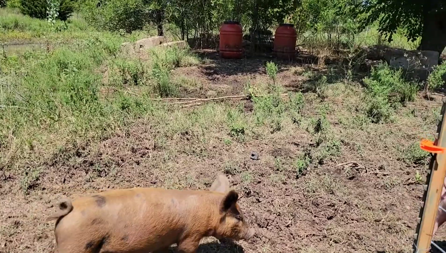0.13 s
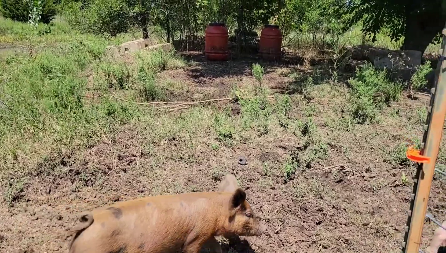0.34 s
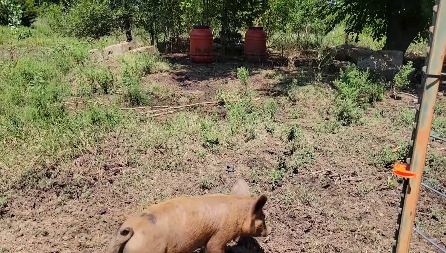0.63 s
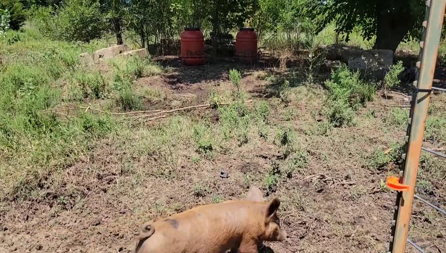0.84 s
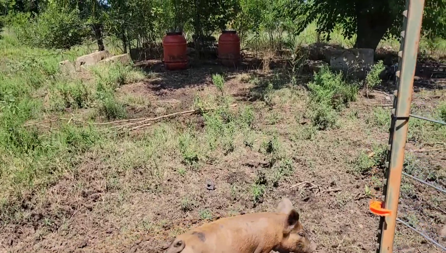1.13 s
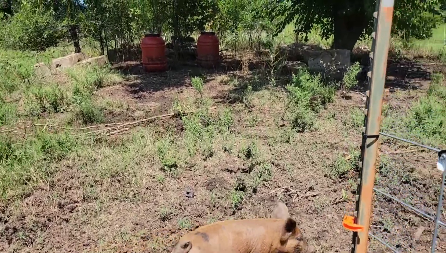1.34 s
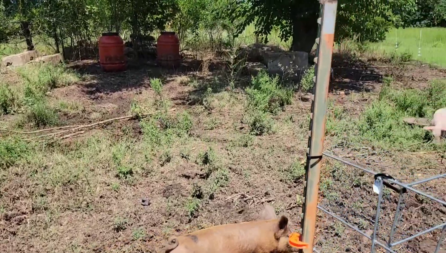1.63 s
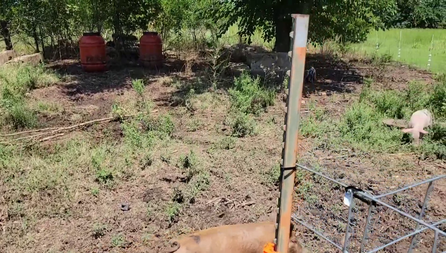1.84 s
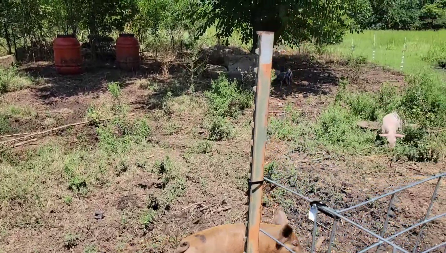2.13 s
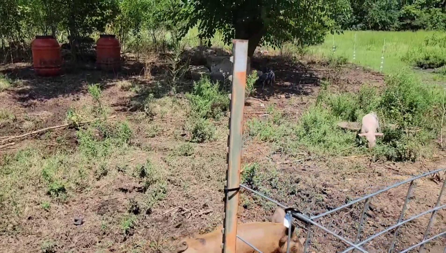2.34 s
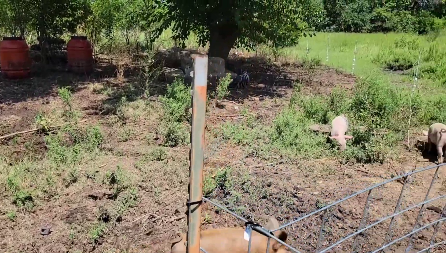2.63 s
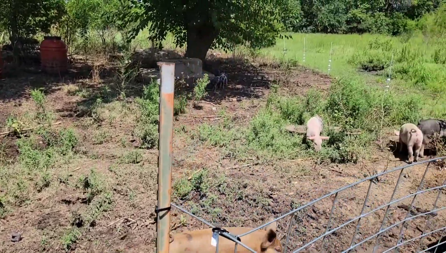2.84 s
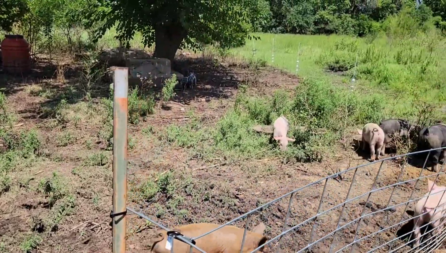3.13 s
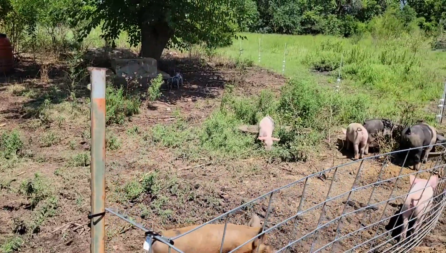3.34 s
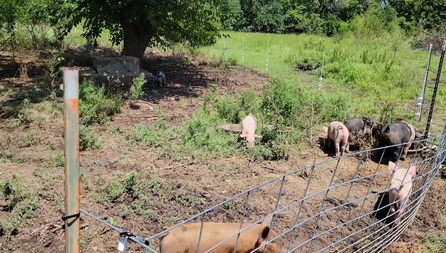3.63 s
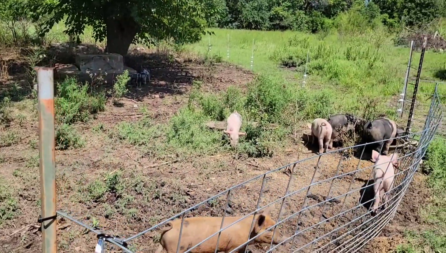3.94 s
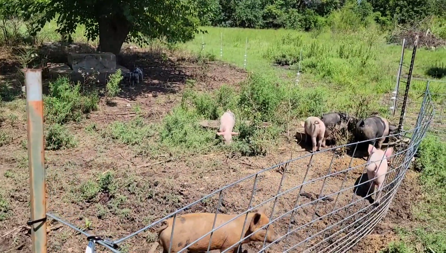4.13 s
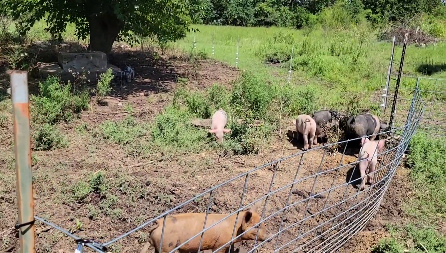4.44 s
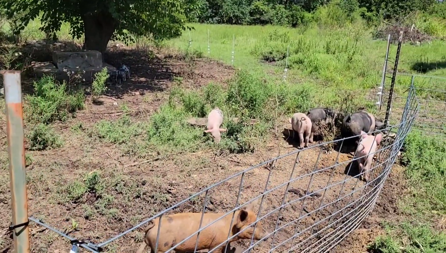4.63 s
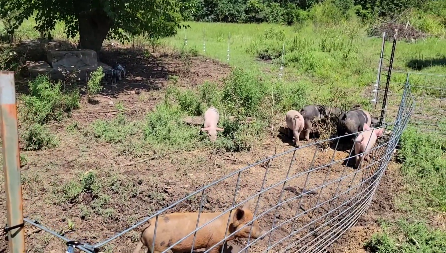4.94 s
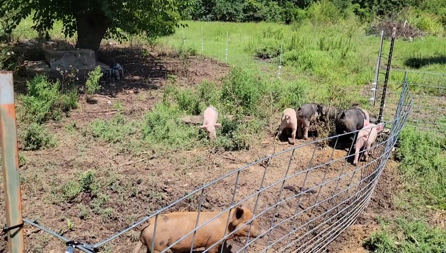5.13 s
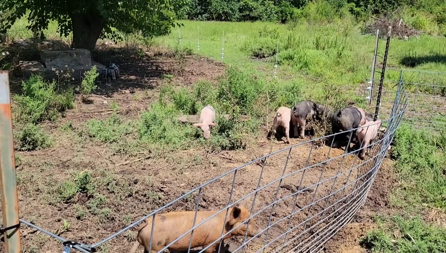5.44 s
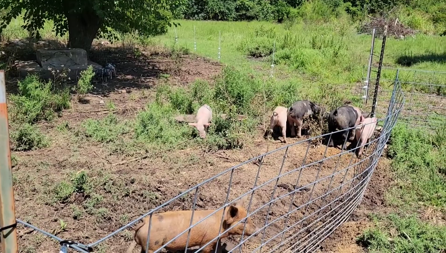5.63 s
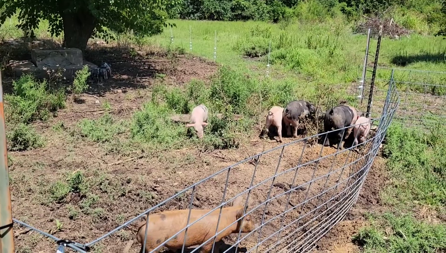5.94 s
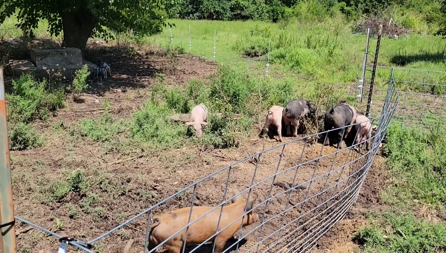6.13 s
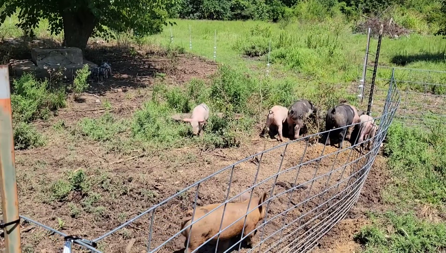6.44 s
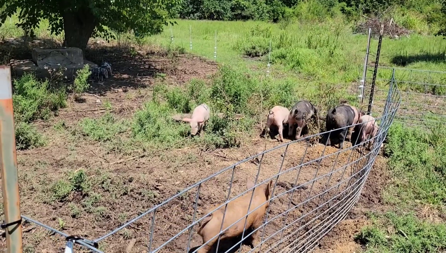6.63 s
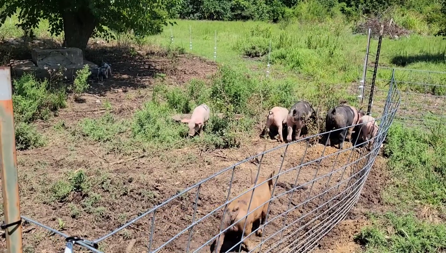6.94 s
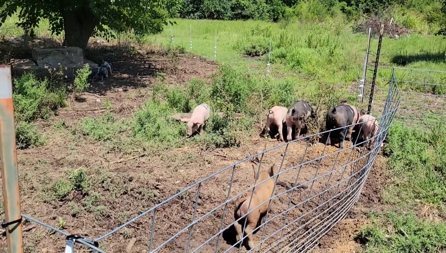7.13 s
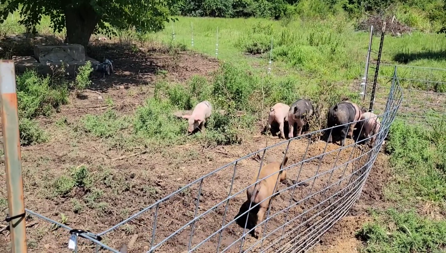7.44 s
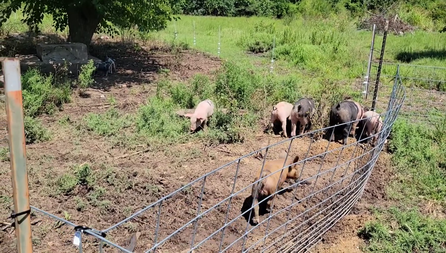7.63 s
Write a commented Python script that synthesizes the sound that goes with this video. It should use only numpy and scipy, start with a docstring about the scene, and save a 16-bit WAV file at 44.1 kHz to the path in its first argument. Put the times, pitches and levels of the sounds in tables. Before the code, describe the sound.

A shrill drone of cicadas over low, gusty wind rumble, with occasional soft grunts, sniffs and smacks from young pigs.

```python
"""Cicadas over a pig pen.

A hot day, heard by a hand-held phone that slowly turns. Two near cicadas buzz in turn, their fast clicks
fusing into combs of overtones with a hiss and a whine; a third throbs lower over a far chorus.
Piglets give short grunts, smacks and sniffs. Wind buffets both microphone ports."""
import sys
import numpy as np
from scipy import signal
from scipy.fft import rfft, irfft
from scipy.io import wavfile
from scipy.ndimage import uniform_filter1d, map_coordinates

SR = 44100
rng = np.random.default_rng(int(sys.argv[2]) if len(sys.argv) > 2 else 0)


def dump_mix(stems):
    """Bounce the given channels to the path in sys.argv[1] as a 16-bit WAV at rate SR."""
    frames = np.atleast_2d(stems).T  # one column per channel
    limited = np.clip(frames, -1, 1)  # hard clip at full scale
    pcm = np.round(limited * 32767).astype(np.int16)
    wavfile.write(sys.argv[1], SR, pcm)


N = 342642
T = np.arange(N) / SR
# Left port lag; it shrinks as the phone turns towards the first buzzer and the throbber.
FIRST_LAG_MS = np.maximum(0.384 - 0.0853 * T, 0.066)
SECOND_LAG_MS = -0.61


def undb(db):
    return 10 ** (np.asarray(db) / 20)


def level(x, rms_db):
    return x * undb(rms_db) / np.sqrt(np.mean(x ** 2))


def curves(table):
    """Table columns, interpolated linearly in time."""
    times, *columns = np.transpose(table)
    return [np.interp(T, times, column) for column in columns]


def sides(pan_db):
    """Left and right gains; pan is left minus right."""
    return undb(np.array([pan_db, -pan_db]) / 2).reshape(2, -1)


def colour(x, spectrum):
    """Filter by (frequency [Hz], gain [dB]) points; rms 1."""
    hz, db = np.transpose(spectrum)
    bins_hz = np.arange(N // 2 + 1) * SR / N + 1
    gain = undb(np.interp(np.log(bins_hz), np.log(hz), db, -90, -90))
    return level(irfft(rfft(x) * gain, N), 0)


def ring(x, hz, width_hz, passes=1):
    """Resonance with unity gain at the centre."""
    for _ in range(passes):
        x = signal.lfilter(*signal.iirpeak(hz, hz / width_hz, SR), x)
    return x


def drift(rate_hz):
    """Smoothed random steps; spread near 1."""
    hold = int(SR / rate_hz)
    steps = np.repeat(rng.standard_normal(N // hold + 1), hold)
    return 1.39 * uniform_filter1d(uniform_filter1d(steps, hold), hold)[:N]


def swell(peak_s, db, fall_s, rise_ratio=1):
    """Power envelope, linear in dB either side of its peak; drops 20 dB in fall_s."""
    slope_s = np.where(T < peak_s, rise_ratio * fall_s, fall_s)
    return undb(2 * (db - 20 * np.abs(T - peak_s) / slope_s))


def port_noise(lag_ms, coherence):
    """Noise from one side reaches one port first; the rest is diffuse."""
    direct = rng.standard_normal(N)
    late = map_coordinates(direct, [np.arange(N) - lag_ms * SR / 1000], order=3)
    diffuse = rng.standard_normal((2, N))
    return np.sqrt(coherence) * np.array([late, direct]) + np.sqrt(1 - coherence) * diffuse


# Chorus and rustle spectrum: (frequency [Hz], gain [dB])
FIELD_SPECTRUM = [(120, -35), (200, -12.5), (268, -14.5), (777, -16), (1870, -21), (2330, -25),
                  (3190, -9.5), (6050, -7), (6640, -3), (7410, -5), (8900, -3), (11300, -13.5),
                  (15100, -10.5), (16000, -15)]
# Likeness of the ports: (frequency [Hz], correlation [-1..1])
FIELD_CORRELATION = [(150, 0.56), (300, 0.11), (640, -0.37), (1400, -0.61), (2200, -0.029), (3100, -0.24),
                     (16000, 0.039)]
# Treble shading by the turning phone: (time [s], left gain [dB], right gain [dB])
PORT_SHADE = [(0, 0.5, -0.5), (3, 0, 2.5), (5, -4.5, -4.5), (7.77, 0, -3.5)]


def field():
    """Far insects above, leaves and soil below; bands drift independently."""
    correlation = np.interp(np.arange(N // 2 + 1) * SR / N, *np.transpose(FIELD_CORRELATION))
    mid, side = rfft(rng.standard_normal((2, N))) * np.sqrt([1 + correlation, 1 - correlation])
    air = colour(irfft([mid + side, mid - side], N), FIELD_SPECTRUM)
    soil, below_chorus, below_top = (
        signal.sosfiltfilt(signal.butter(3, hz, fs=SR, output="sos"), air) for hz in (800, 2400, 10500))
    rustle = soil * undb(2.25 * drift(9)) + (below_chorus - soil) * undb(2.46 * drift(12))
    rustle_db = np.interp(T, [0, 2.5, 4, 7.77], [1.3, 0.74, -1.4, -0.94])  # the nearest pig walks off
    chorus = below_top - below_chorus
    top = (air - below_top) * undb(1.65 * np.array([drift(14), drift(14)]))
    shade = ring(air, 9150, 3400) * (undb(curves(PORT_SHADE)) - 1)
    return undb(-45) * (rustle * undb(rustle_db) + chorus + top + shade)


# Gusts: (peak time [s], relative level [dB], pan [dB], flap offset [dB], 20 dB fall time [s])
GUSTS = [(.08, -48, -8, -9.5, 0.9), (.302, -48, -11.5, -22, 0.2), (.874, -32.5, -5.5, -4, 0.09),
         (.964, -40.5, 5, -22, 0.44), (1.03, -45.5, 4, -24, 0.46), (1.235, -38.5, 1, -11, .1),
         (1.33, -38.5, -3, -11, 0.1), (1.436, -33, 8.5, -12, 0.02), (1.645, -39.5, -7, -16, 0.16),
         (1.709, -41, -10, -14, 0.12), (1.913, -39.5, -8, -13.5, 0.1), (2.302, -47, -10, -11, 0.56),
         (2.44, -42.5, -13, -14, 0.2), (2.87, -38.5, -9.5, -10.5, 0.32), (3.008, -34.5, 11.5, -12.5, 0.22),
         (3.41, -35, 1.5, -18.5, 0.23), (3.706, -40.5, 0, -14.5, 0.22), (4.103, -44, 6, -15.5, .24),
         (4.331, -25, -3.5, -5.5, 0.09), (4.519, -40, -10.5, -17, 0.17), (4.766, -43, -8, -13, 0.24),
         (4.861, -38, 5.5, -15, 0.41), (5.241, -43, -12, -23, .18), (5.467, -32, 5.5, -15.5, .09),
         (5.557, -33.5, 0.5, -23, .14), (5.7, -39.5, 3, -30, 0.16), (5.846, -43, 3.5, -33, .5),
         (6.364, -42.5, -4.5, -13, 0.13), (6.477, -38, 6, -17, 0.04), (6.61, -36.5, -8, -19, 0.27),
         (6.872, -38.5, 1, -21, 0.26), (7.024, -38, 2, -28, 0.2), (7.205, -34, 3.5, -18.5, 0.12),
         (7.319, -33.5, 13.5, -14.5, -0.02), (7.386, -31.5, 2.5, -22, 0.13), (7.495, -38.5, 9, -21, 0.2),
         (7.734, -36, 4, -22, .2)]
# Buffeting spectrum: (frequency [Hz], gain [dB])
WIND_SPECTRUM = [(8.8, 2), (15, -23.5), (46, 1.5), (69, 5.5), (119, -7.5), (190, -33.5), (373, -52),
                 (413, -77), (500, -40.5), (650, -41.5), (1100, -120)]


def wind(breeze_db=-55, breeze_flap_db=-11.5):
    """Eddies thump each port separately over a swaying breeze; sharp gusts flap higher."""
    sway_db = 0.5 * np.array([drift(5.4), drift(6.19)])
    thump_power = undb(2 * (breeze_db + sway_db)) * sides(2) ** 2
    flap_power = thump_power * undb(2 * breeze_flap_db)
    for peak_s, db, pan_db, flap_db, fall_s in GUSTS:
        gust = swell(peak_s, db, max(fall_s, 0.03), rise_ratio=0.84) * sides(pan_db) ** 2
        thump_power += gust
        flap_power += gust * undb(2 * flap_db)
    eddy_db = np.array([drift(25), drift(25)])
    thump = colour(rng.standard_normal((2, N)), WIND_SPECTRUM) * undb(3.5 + 1.28 * eddy_db)
    flap = ring(rng.standard_normal((2, N)), 150, 86, passes=2)
    flap = level(ring(flap, 224, 300), -1.5) * undb(2.5 * eddy_db)
    return thump * np.sqrt(thump_power) + flap * np.sqrt(flap_power)


# Piglet sniffs: (mid time [s], length [s], level [dB], centre [Hz], pan [dB])
SNIFFS = [(0.138, 0.038, -64, 1400, -1), (2.636, 0.049, -67, 2000, -8), (5.126, .06, -77, 1600, -13),
          (5.645, 0.033, -72, 1600, -16), (6.048, 0.032, -65.5, 1800, -8)]


def sniffs():
    """Short puffs of air."""
    out = np.zeros((2, N))
    for mid_s, length_s, db, hz, pan_db in SNIFFS:
        puff = np.exp(-(2 * (T - mid_s) / length_s) ** 4)
        out += level(ring(rng.standard_normal(N), hz, 600), db) * puff * sides(pan_db)
    return out


# Smacks and ticks: (time [s], relative level [dB], ring [Hz], pan [dB])
SMACKS = [(0.775, -51, 721, -3), (1.096, -56, 2090, 5), (2.488, -59, 1440, -0.5), (2.689, -49.5, 1340, 1),
          (2.728, -59, 1120, -8), (2.818, -62, 735, 5), (4.91, -58, 2145, -14), (6.035, -57, 854, 2),
          (6.184, -57, 1820, -18)]


def smacks(rise_s=0.0035):
    """Lip smacks and hoof ticks ring briefly."""
    out = np.zeros((2, N))
    for start_s, db, hz, pan_db in SMACKS:
        age_s = np.clip(T - start_s, 0, 1)
        tone = 0.46 * np.sin(2 * np.pi * hz * age_s)
        noise = level(ring(rng.standard_normal(N), hz, 600, passes=2), -13)
        envelope = age_s / rise_s * np.exp(1 - age_s / rise_s)
        out += undb(db) * (tone + noise) * envelope * sides(pan_db)
    return out


# Grunts: (start [s], length [s], pulse rate [Hz], level [dB], snout offset [dB], pan [dB], crest [0..1])
GRUNTS = [(0.136, 0.084, 50, -65.5, -20, -17, 0), (2.868, .04, 39.9, -60, -16, -12, 0.2),
          (3.597, 0.039, 45.2, -66, -25, -8, 0.4), (4.2886, 0.081, 55.8, -47.5, -11.5, -13, 0.28),
          (5.992, 0.064, 45.9, -57.5, -22, -3, 0.7)]
# Airway resonances: (centre [Hz], width [Hz], gain [dB])
THROAT_MODES = [(206, 133, 4.5), (350, 93, 9), (554, 120, 1), (854, 160, -7.5)]
SNOUT_MODES = [(1850, 100, -10), (2484, 180, 5)]


def grunts():
    """A few rough pulses ring the throat; after each, air puffs through the snout."""
    out = np.zeros((2, N))
    lowpass = signal.butter(4, 1000, fs=SR, output="sos")
    whistle = np.sin(2 * np.pi * SNOUT_MODES[-1][0] * T) / 8
    for start_s, length_s, rate_hz, db, snout_db, pan_db, crest in GRUNTS:
        progress = (T - start_s) / length_s
        envelope = np.interp(progress, [0, np.clip(crest, 0.1, 0.9), 1], [0.35, 1, 0.4], 0, 0)
        phase = (T - start_s) * rate_hz % 1
        pulses = 13 * (phase < rate_hz / SR) + 0.9 * rng.standard_normal(N) * np.exp(-phase / 0.3)
        puffs = (whistle + rng.standard_normal(N)) * np.exp(-((phase - 0.25) / 0.2) ** 2)
        throat = sum((-1) ** k * undb(gain_db) * ring(pulses * envelope, hz, width_hz)
                     for k, (hz, width_hz, gain_db) in enumerate(THROAT_MODES))
        snout = sum(undb(gain_db) * ring(puffs * envelope ** 2, hz, width_hz, passes=2)
                    for hz, width_hz, gain_db in SNOUT_MODES)
        voice = level(signal.sosfilt(lowpass, throat), db) + level(snout, db + snout_db)
        out += voice * np.sqrt(length_s / T[-1]) * sides(pan_db)  # rms over the grunt's length
    return out


# Throbbing song: (time [s], throb rate [Hz], relative level [dB], pan [dB])
THROB_SONG = [(0, 38.2, -50.5, -3.5), (.26, 39.23, -52, -3), (1.36, 39.16, -50.5, -3.5),
              (2.2, 39.24, -49.5, -1), (2.45, 39.15, -50.5, -3), (3.7, 39.35, -51, -4.5),
              (4.6, 39.35, -49, -2), (6.05, 39.48, -51, -2.5), (7.1, 37.7, -53.5, -4.5),
              (7.23, 37.7, -57.5, 1), (7.36, 36.5, -69, -2), (7.77, 36.4, -70, -6)]
# Clicks in one throb: (phase [0..1], level [dB])
RIB_CLICKS = [(0, 0), (.14, 0), (.27, -3), (.38, -1), (.54, -2), (.7, -7)]
# Throb spectrum: (frequency [Hz], gain [dB])
THROB_SPECTRUM = [(1470, -37), (2500, -13.5), (2750, -8.5), (3000, 6), (3140, 6), (3650, 4.5), (4190, 5.5),
                  (4540, 6), (5600, -0.5), (7280, -62), (12300, -120)]


def throbbing_cicada():
    """Each throb is a run of rib clicks: noise bursts that start sharply and decay."""
    rate_hz, db, pan_db = curves(THROB_SONG)
    phase = (np.cumsum(rate_hz) / SR + 0.3) % 1
    clicks = sum(undb(click_db) * np.exp(-((phase - onset) % 1) / 0.09) for onset, click_db in RIB_CLICKS)
    gate = 0.27 + uniform_filter1d(clicks, 30)
    fade = np.clip((db + 58) / 6, 0.05, 1)  # sinks into the chorus as the song stops
    bursts = port_noise(FIRST_LAG_MS, coherence=0.66) * gate
    return colour(bursts, THROB_SPECTRUM) * undb(db + 2) * fade * sides(pan_db)


# Hiss of the buzzers: (time [s], relative level [dB], pan [dB])
BODY_HISS = [(0, -52, -6), (.76, -61, -7), (1.34, -50, -13), (2.7, -55, -6), (3.14, -43, -1),
             (4.26, -47.5, -6), (5.3, -57, -6), (7.77, -51, -2)]


def body_hiss():
    """Noise fills the low body resonance of the first buzzer, then the second."""
    db, pan_db = curves(BODY_HISS)
    air = port_noise(np.where(T < 3.5, FIRST_LAG_MS, SECOND_LAG_MS), coherence=0.17)
    return level(ring(air, 5800, 2000, passes=2), -6) * undb(db) * sides(pan_db)


# Whine swells: (peak time [s], relative level [dB], pan [dB], 20 dB fall time [s])
WHINE_SWELLS = [(1.3, -38, 9.5, 0.4), (2.67, -37.5, 11.5, .5), (4.15, -44.5, 9, 0.4),
                (5.8, -47.5, 9.5, 1.2), (6.85, -47, 12.5, 0.9)]


def whine(combs):
    """Uneven click timing blurs each high overtone into a narrow whine."""
    band = ring(combs, 8950, 800, passes=2)
    steady = band / np.sqrt(uniform_filter1d(band ** 2, SR // 4))
    jittered_index = np.arange(N) + 0.7 * drift(45)
    blurred = np.array([map_coordinates(port, [jittered_index], order=3, mode="nearest")
                        for port in steady])
    power = sum(swell(peak_s, db, fall_s) * sides(pan_db) ** 2
                for peak_s, db, pan_db, fall_s in WHINE_SWELLS)
    floor = undb(-61) * sides(20)
    return level(blurred, -7) * (np.sqrt(power) + floor)


def buzz(song, click_rate, overtones, lag_ms, split_hz, beat_hz, low_beat_depth, high_beat_depth):
    """Regular clicks give a comb of overtones, in a low and a high group, that beat and wander."""
    low_db, high_db, pan_db = curves(song)
    rate_hz, = curves(click_rate)
    singing = (T > song[0][0] - 0.1) * (T < song[-1][0] + 0.25)
    gate = uniform_filter1d(singing.astype(float), SR // 5) * sides(pan_db)
    low, high = undb(low_db) * gate, undb(high_db) * gate
    lag_cycles = np.array([rate_hz * lag_ms / 1000, np.zeros(N)])
    click_phase = 2 * np.pi * (np.cumsum(rate_hz) / SR - lag_cycles)
    beat_phase = 2 * np.pi * np.cumsum(beat_hz + 0.76 * drift(2.374)) / SR
    out, smear = 0, 0
    for order, *port_db in overtones:
        gain, depth = (high, high_beat_depth) if order * click_rate[0][1] > split_hz else (low, low_beat_depth)
        tone_offset, beat_offset, step = 2 * np.pi * rng.random(3)
        smear += 0.76 * (step - np.pi)  # echoes off leaves and ground spread each click
        tone = np.sin(order * click_phase + smear)
        sidebands = np.sin(order * click_phase + tone_offset) * np.cos(beat_phase + beat_offset)
        wander = undb(np.array(port_db)[:, None] + 2.1 * drift(4.5))
        out += np.sqrt(2) * wander * (tone + depth * sidebands) * gain
    return out


# Buzzing songs: (time [s], low group gain [dB], high group gain [dB], pan [dB])
FIRST_SONG = [(0, 3.5, -0.5, -4), (.9, -1.5, -0.5, 0.5), (1.3, -1, 4.5, -1), (1.8, 4.5, -14, -4),
              (2.05, 3, -11, -1), (2.3, -2, -10, 5), (2.7, -5.5, -6, 5), (3.05, 0.5, -9, -2),
              (3.3, 3.5, -17, 1), (3.5, -15, -14, 2), (3.75, -16, -12, 1.2)]
SECOND_SONG = [(2.8, -12, -4, -2), (3.8, -2, -0.5, 1.1), (4.4, 2.5, 4.5, 1.04), (5.3, -1.5, -5, -0.11),
               (5.6, 1.5, 0, 0.83), (6.1, 2.5, 1.2, .8), (7.1, -0.2, -4, -.7), (7.55, -0.5, -9, -1.5)]
# Click rates: (time [s], rate [Hz])
FIRST_CLICK_RATE = [(0, 167.5), (.6, 167.64), (1.4, 168.22), (2.6, 168.86), (3, 168.78), (3.4, 168.24)]
SECOND_CLICK_RATE = [(3, 182.26), (4.2, 182.9), (5, 182.96), (5.8, 183.14), (7, 183.86), (7.4, 183.72)]
# Overtones: (order [x click rate], left level [dB], right level [dB])
FIRST_OVERTONES = [(31.0, -70.0, -67.0), (33.0, -74.0, -72.0), (35.0, -64.0, -59.0), (36.0, -73.0, -70.0),
                   (37.0, -59.0, -52.0), (38.0, -71.0, -68.0), (39.0, -64.0, -60.0), (40.0, -69.0, -64.0),
                   (41.0, -61.0, -56.0), (42.0, -67.0, -60.0), (43.0, -67.0, -62.0), (44.0, -72.0, -67.0),
                   (45.0, -64.0, -61.0), (46.0, -62.0, -59.0), (47.0, -68.0, -64.0), (48.0, -67.0, -70.0),
                   (49.0, -60.0, -63.0), (50.0, -53.0, -58.0), (51.0, -67.0, -75.0), (52.0, -56.0, -59.0),
                   (53.0, -63.0, -66.0), (54.0, -57.0, -59.0), (55.0, -65.0, -64.0), (56.0, -59.0, -58.0),
                   (58.0, -70.0, -72.0)]
SECOND_OVERTONES = [(23.0, -69.0, -72.0), (25.0, -65.0, -68.0), (27.0, -72.0, -75.0), (29.0, -62.0, -70.0),
                    (30.0, -69.0, -78.0), (31.0, -62.0, -68.0), (32.0, -58.0, -62.0), (33.0, -60.0, -65.0),
                    (34.0, -63.0, -63.0), (35.0, -61.0, -60.0), (36.0, -56.0, -55.0), (37.0, -62.0, -61.0),
                    (38.0, -58.0, -59.0), (39.0, -70.0, -72.0), (40.0, -59.0, -61.0), (41.0, -68.0, -68.0),
                    (42.0, -64.0, -67.0), (43.0, -66.0, -73.0), (44.0, -62.0, -75.0), (45.0, -64.0, -76.0),
                    (46.0, -66.0, -76.0), (47.0, -66.0, -81.0), (48.0, -63.0, -69.0), (49.0, -62.0, -72.0),
                    (50.0, -63.0, -72.0), (51.0, -69.0, -74.0)]


def buzzing_cicadas():
    """Two near cicadas click in turn from opposite sides, overlapping briefly."""
    first = buzz(FIRST_SONG, FIRST_CLICK_RATE, FIRST_OVERTONES, FIRST_LAG_MS,
                 split_hz=7450, beat_hz=49, low_beat_depth=0.6, high_beat_depth=0.9)
    second = buzz(SECOND_SONG, SECOND_CLICK_RATE, SECOND_OVERTONES, SECOND_LAG_MS,
                  split_hz=7600, beat_hz=54, low_beat_depth=0.6, high_beat_depth=1.3)
    return first + second


def scene():
    combs = buzzing_cicadas()
    return (wind() + combs + body_hiss() + whine(combs) + throbbing_cicada() + field()
            + grunts() + smacks() + sniffs())


def record(dry):
    """The phone cuts the top treble steeply."""
    return signal.sosfilt(signal.ellip(12, 0.2, 80, 15720, fs=SR, output="sos"), dry)


dry = scene()
out = record(dry)
dump_mix(out)
```